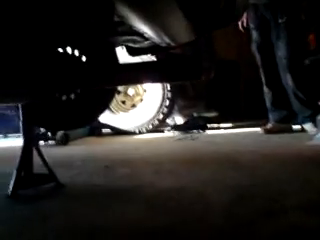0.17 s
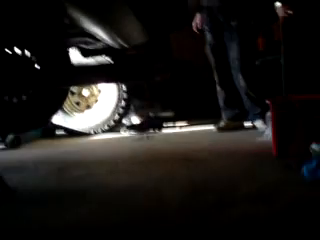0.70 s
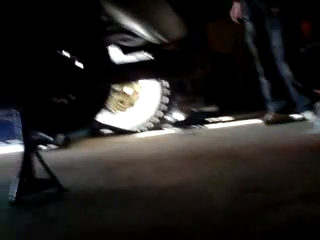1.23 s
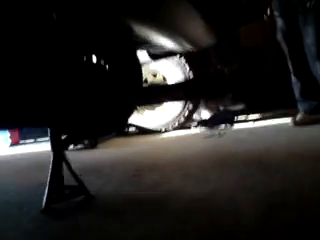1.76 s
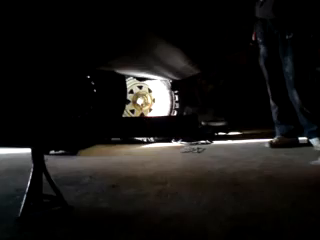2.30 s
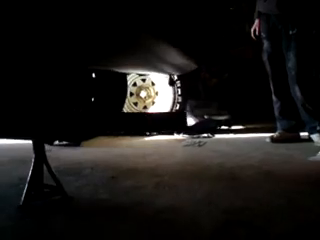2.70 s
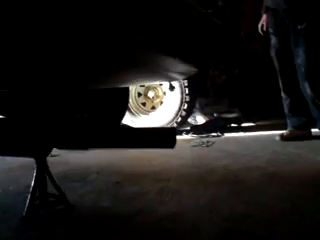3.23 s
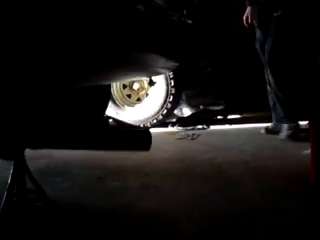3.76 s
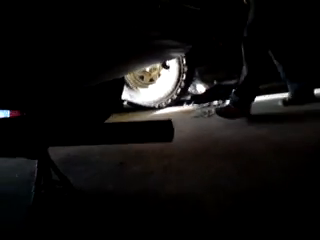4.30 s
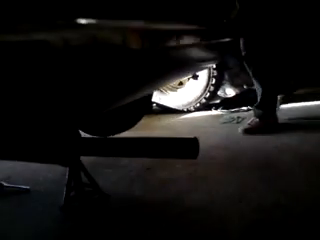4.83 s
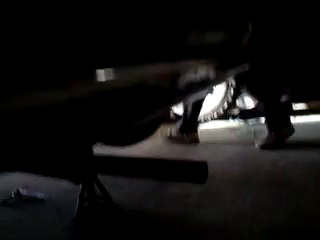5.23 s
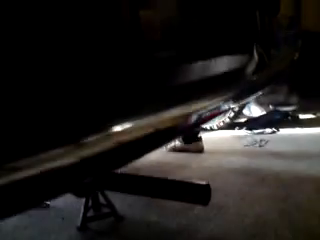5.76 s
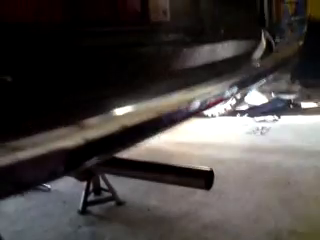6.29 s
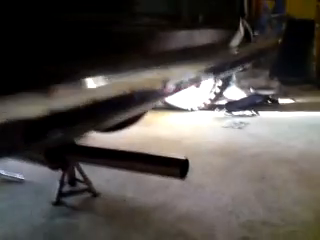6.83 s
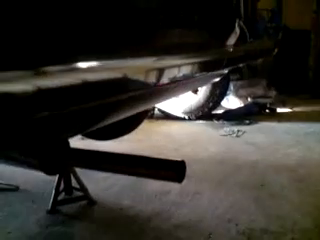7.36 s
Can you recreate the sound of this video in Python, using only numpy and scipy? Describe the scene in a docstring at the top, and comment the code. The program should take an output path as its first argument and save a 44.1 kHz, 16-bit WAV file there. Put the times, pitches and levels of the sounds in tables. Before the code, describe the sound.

A small four-cylinder car engine runs loudly through a homemade exhaust in a workshop, heard close, its uneven pulses slightly overloading the microphone. From the start it is blipped with a raspy bark over a mechanical whirr, climbing to higher revs from about 1 to 2.7 seconds. A thin leak whistle chirps between 1.7 and 2.4 seconds, and the pipe rings faintly around 2 seconds. Two more sharp blips come at about 3 and 3.6 seconds. By 4.5 seconds the engine settles into a lumpy idle that keeps slowing. A deep thrum swells around 5.5 seconds, followed by a hollow note until about 6.5 seconds as the microphone passes the pipe's mouth. From 6.1 to 6.8 seconds something metal rubs with a ringing hiss. The idle throbs on to the end at 7.5 seconds, with a short room echo.

```python
"""First comes the bark of a small four-cylinder engine, blipped through a homemade exhaust in a workshop.
Two cylinders fire much harder than the others; their pulses excite the pipe's modes, rasp at its mouth
and overload the microphone. The engine whirrs behind, and a leak chirps at high revs. As the engine
sinks to a lumpy idle, the air under the car thrums, a hollow note swells and the microphone passes
the pipe mouth. Near the end something rubs with a ringing hiss."""
import sys
import numpy as np
from scipy import signal
from scipy.fft import rfft, irfft, next_fast_len
from scipy.io import wavfile
from scipy.ndimage import uniform_filter1d

SR = 44100
rng = np.random.default_rng(int(sys.argv[2]) if len(sys.argv) > 2 else 0)


def bounce(signal):
    """Save signal as a 16-bit WAV file at the path given by the first command-line argument."""
    frames = np.transpose(np.atleast_2d(signal))
    limited = np.clip(frames, -1, 1)
    pcm = np.round(limited * 32767).astype(np.int16)
    wavfile.write(sys.argv[1], SR, pcm)


N = 331191
TIME = np.arange(N) / SR

# Crankshaft speed. Each row: time in seconds, revolutions per minute.
CRANK_SPEED = [(0.0, 2015.0), (0.19, 2120.0), (0.39, 1890.0), (0.65, 2034.0), (1.11, 2547.0),
               (1.39, 2671.0), (1.69, 2435.0), (2.12, 2717.0), (2.58, 2553.0), (2.98, 2112.0),
               (3.32, 2316.0), (3.6, 1892.0), (3.76, 2088.0), (4.06, 2219.0), (4.42, 1874.0),
               (5.13, 1874.0), (5.87, 1578.0), (6.7, 1447.0), (7.5, 1397.0)]
LOW_RPM, MID_RPM, TOP_RPM = 1450, 1900, 2650
SETTLE_S = [4.1, 4.56]   # revving gives way to idling
# Pedal presses. Each row: start in seconds, rise time in seconds, widest opening (0-1), release in
# seconds, opening at release (0-1).
PEDAL_PRESSES = [(-.2, .2, .87, .08, .8), (.35, .28, .86, 1.42, .35), (1.43, .29, .56, 2.88, .25),
                 (2.97, .1, .93, 3.26, .78), (3.58, .15, .94, 4.04, .8), (4.33, .27, .4, 7.6, .23)]
# The four firings. Each row: coasting strength in dB, then its change in dB at full throttle, at lowest
# idle and at top speed.
FIRING_STRENGTHS = [(1.6, 1.0, -6.3, 3.1), (0.3, -0.2, 2.6, 3.7), (-3.7, -10.0, -3.4, -3.5),
                    (-3.4, -7.6, -4.2, -3.2)]
# Firing order. Each entry: nominal position as a fraction of the cycle.
FIRING_PHASES = [.009, .262, .533, .81]

# Modes of the pipe and the space under the car. Each row: frequency in Hz, bandwidth in Hz, then relative
# strength (sign gives the side of the node) at the blips, at high revs, idling beside the pipe, passing
# its mouth and behind the car.
EXHAUST_MODES = [(38.2, 15.8, 0.3, 0.7, -1.3, -0.1, -0.7), (55.6, 27.9, -0.6, -0.8, 0.8, 0.3, 0.3),
                 (73.2, 13.5, 0.5, 0.1, -0.8, 0.2, 0.6), (90.4, 14.4, -1.2, 0.4, 0.2, -1.2, -0.7),
                 (102.1, 8.5, 0.3, -0.7, -1.2, -0.4, -1.7), (121.4, 36.3, 0.45, -0.0, 1.1, 0.9, 0.9),
                 (166.3, 17.4, -0.3, -0.2, -1.5, -0.7, -1.0), (201.0, 13.8, -0.9, -0.9, 0.0, 0.6, 1.2),
                 (217.3, 22.7, 1.0, -0.2, 1.3, 0.2, 0.7), (249.4, 244.3, -2.2, 1.0, -0.0, -0.4, -0.5),
                 (282.7, 23.9, -0.3, -1.2, -0.6, -0.5, -0.9), (326.2, 23.7, 0.4, 0.3, 0.3, 0.15, 0.0),
                 (352.6, 19.1, 0.2, 0.5, 0.2, -0.0, 0.15), (397.1, 29.2, 0.25, 0.2, -0.1, -0.0, -0.0),
                 (437.2, 18.2, 0.1, -0.1, 0.7, 0.3, 0.5), (471.0, 116.7, 0.5, 0.0, 0.0, -0.1, -0.1),
                 (532.7, 30.0, -0.0, -0.0, 0.1, -0.2, 0.0), (571.8, 29.8, 0.1, 0.2, 0.2, -0.1, -0.1),
                 (620.3, 40.1, 0.12, 0.1, 0.3, -0.2, -0.1), (839.5, 49.7, -0.0, 0.1, 0.1, -0.1, -0.12)]
BLIP_RPM, HIGH_RPM = 2150, 2550
APPROACH_S, PAST_S = [5.3, 5.8], [6.2, 6.6]   # the microphone nears the mouth, then goes behind the car
# Boom of the low modes. Each row: time in seconds, relative level in dB.
BOOM_ENVELOPE = [(0.0, -23), (0.31, -24), (0.46, -17), (0.62, -25), (1.27, -20), (2.78, -21), (2.9, -17),
                 (3.28, -26), (3.41, -21), (3.55, -27), (3.72, -20), (4.28, -27), (4.55, -16), (5.24, -16),
                 (5.51, -21), (5.91, -16), (6.23, -18), (7.5, -17)]
# Gain laws. Each lists, in dB: gain coasting at middle speed, then its change at full load, per doubling
# of speed and once idling.
BARK_LAW = (-29.3, 14.9, -2, -.3)
EDGE_LAW = (-3, 4.5, -2, -3)   # the bark's bright part, relative to the rest
RASP_LAW = (-35.3, 1.8, 10, 3.6)
HISS_LAW = (-39.7, 5.4, 3.5, 1.8)

# Spectra of the rasp and the hiss. Each row: frequency in Hz, relative spectral density in dB.
RASP_SPECTRUM = [(350, -32), (600, -3), (752, -8.5), (830, -5), (885, -5.5), (1090, -6.3), (1200, -7.5),
                 (1430, -9.5), (1610, -8.3), (1820, -13.5), (2400, -18.5), (3120, -40.5), (5280, -120)]
HISS_SPECTRUM = [(1180, -32.5), (2000, -1), (2400, -2), (2720, 1), (3130, 2), (3570, 0), (3890, -1),
                 (5000, -9), (6360, -11.5), (6730, -13.5), (7130, -33), (7860, -21), (10200, -50),
                 (17300, -120)]
# Slow wander of both. Each row: time in seconds, gain in dB.
TREBLE_DRIFT = [(0, .2), (.75, -1.3), (1.3, .3), (1.9, 0), (2.6, 1.5), (3.05, 2.4), (3.2, -.5), (4.3, -.8),
                (6.5, 1.6), (7, -1)]
# Modes of the pipe wall. Each row: frequency in Hz, bandwidth in Hz, relative level in dB.
WALL_RESONANCES = [(828, 26, 0), (950, 30, -5), (1215, 40, -13)]
# Ringing of the wall. Each row: time in seconds, level in dB.
WALL_ENVELOPE = [(0, -54), (1.1, -48), (1.35, -44), (1.7, -48), (2.0, -32.5), (2.3, -32.5), (2.7, -42),
                 (3.5, -49), (4.3, -48), (4.7, -36), (5.4, -38), (5.9, -40.5), (7.5, -38.5)]
# Whistle of the leak. Each row: time in seconds, frequency in Hz, level in dB.
LEAK_WHISTLE = [(1.62, 3500, -56), (1.75, 3350, -35), (1.84, 3200, -36), (1.89, 3900, -37.5),
                (2.05, 4050, -41), (2.3, 4000, -44), (2.5, 3950, -54)]
# Air mode under the car. The row: frequency in Hz, bandwidth in Hz, peak gain in dB.
THRUM_RESONANCE = [(45, 26, 24)]
# Swell of that mode. Each row: time in seconds, level in dB.
THRUM_ENVELOPE = [(4.3, -50), (4.6, -33), (5.25, -28), (5.5, -18), (5.7, -18), (5.9, -31), (6.2, -30),
                  (6.5, -28), (7.5, -27)]
# Modes of the hollow note. Each row: frequency in Hz, bandwidth in Hz, relative level in dB.
HOLLOW_RESONANCES = [(464, 22, 0), (560, 26, -4)]
# Swell of the hollow note. Each row: time in seconds, level in dB.
HOLLOW_ENVELOPE = [(5.3, -60), (5.65, -36), (6.0, -35.5), (6.35, -36), (6.7, -42), (7.5, -46)]

# Course of the rubbing. Each row: time in seconds, level in dB.
RUB_ENVELOPE = [(6.04, -71), (6.13, -35.5), (6.27, -29.5), (6.45, -27), (6.62, -28), (6.77, -30),
                (6.84, -62)]
# Friction noise. Each row: frequency in Hz, relative spectral density in dB.
RUB_SPECTRUM = [(530, -34.5), (900, -10), (1270, -7), (1320, -4.5), (1430, -11.5), (1560, -5), (2800, -12),
                (3120, -4), (5620, -26), (6100, -25), (7860, -49), (10200, -84), (17300, -120)]
# Modes of the rubbed metal. Each row: frequency in Hz, bandwidth in Hz, peak gain in dB.
RUB_RESONANCES = [(1122, 22, 8), (1338, 24, 10), (1530, 40, 4), (1808, 24, 5), (2345, 50, 4), (3020, 60, 5),
                  (3230, 45, 4), (3490, 35, 3)]
# Tones sustained by friction. Each row: frequency in Hz, level in dB relative to the friction noise.
RUB_TONES = [(365, -8), (1340, -13), (3022, -21)]


def from_db(db):
    """Amplitude grows tenfold for every 20 dB."""
    return 10 ** (np.asarray(db) / 20)


def in_time(rows, at=TIME):
    """Linear interpolation of each column against the first, time."""
    seconds, *columns = np.transpose(rows)
    return [np.interp(at, seconds, column) for column in columns]


def butter(x, hz, kind, order=2):
    """A causal Butterworth filter, maximally flat in its passband."""
    return signal.sosfilt(signal.butter(order, hz, kind, fs=SR, output="sos"), x + 1e-18)


def below(x, hz, order=4):
    """Zero-phase low-pass: filtering forwards and backwards cancels the delay."""
    return butter(butter(x, hz, "low", order)[::-1], hz, "low", order)[::-1]


def levelled(x):
    """Division by the running rms holds the level at 1 but keeps the throb within each engine cycle."""
    size = SR // 11
    return x / np.sqrt(uniform_filter1d(uniform_filter1d(x * x, size), size) + 1e-20)


def resonator(x, hz, width):
    """Forced response of one damped mode, with unit gain at resonance."""
    return signal.lfilter(*signal.iirpeak(hz, hz / width, fs=SR), x)


def resonate(x, peaks):
    """Resonances in series each lift a band. Each peak: frequency in Hz, bandwidth in Hz, gain in dB."""
    for hz, width, db in peaks:
        x = x + (from_db(db) - 1) * resonator(x, hz, width)
    return x


def coloured(x, spectrum):
    """Filtering by multiplication in the frequency domain."""
    hz, db = np.transpose(spectrum)
    size = next_fast_len(N)
    bins = np.maximum(np.fft.rfftfreq(size, 1 / SR), 1)
    gain = from_db(np.interp(np.log(bins), np.log(hz), db, left=-99, right=-99))
    return irfft(rfft(x, size) * gain, size)[:N]


def dying(x, seconds):
    """Exponential decay follows each impulse, with the given time constant."""
    return signal.lfilter([1], [1, -np.exp(-1 / (seconds * SR))], x + 1e-18)


def eddies(pulses, seconds):
    """Turbulence decays after each pulse as a burst of noise."""
    return dying(pulses, seconds) * rng.standard_normal(N)


def scatter(x, t60):
    """Diffuse reflection from underbody, floor and walls: convolution with decaying unit-energy noise."""
    t = TIME[:int(t60 * SR)]
    echoes = rng.standard_normal(len(t)) * from_db(-60 * t / t60)
    return signal.oaconvolve(x, echoes / np.linalg.norm(echoes))[:N]


def throttle(at=TIME, shut_s=.04):
    """The opening (0-1) rises with each press, eases off, then relaxes exponentially under its spring."""
    opening = 0
    for start, rise, widest, end, last in PEDAL_PRESSES:
        held = np.interp(at, [start, start + rise, end], [0, widest, last])
        opening = opening + held * np.exp(-np.maximum(at - end, 0) / shut_s)
    return np.clip(opening, 0, 1)


def load():
    """Cylinder filling saturates: it rises quickly with the first of the opening, then levels off."""
    return 1 - (1 - throttle()) ** 2


def idling():
    """A linear crossfade from revving (0) to settled idle (1)."""
    return np.interp(TIME, SETTLE_S, [0, 1])


def engine_gain(law):
    """The effects of load, speed and idling add in decibels."""
    coasting_db, load_db, speed_db, idle_db = law
    doublings = np.log2(in_time(CRANK_SPEED)[0] / MID_RPM)
    return from_db(coasting_db + load_db * load() + speed_db * doublings + idle_db * idling())


def firings(lag_per_db=.0055, jitter_s=.00006, uneven_db=.7):
    """The four-stroke cycle gives four pulses in two turns; the weak ones leave later."""
    cycles = np.cumsum(in_time(CRANK_SPEED)[0]) / (120 * SR) - .88
    count = np.arange(-1, int(cycles[-1]) + 1)
    starts = np.interp(count, cycles, TIME)
    opening, rpm = throttle(starts), in_time(CRANK_SPEED, starts)[0]
    stumble = np.where((opening < .2) | (rpm < 1700), 2.2, 1)   # shut throttle or slow idle burns unevenly
    pulses = np.zeros(N)
    for phase, (coasting_db, open_db, low_db, top_db) in zip(FIRING_PHASES, FIRING_STRENGTHS):
        speed_db = np.interp(rpm, [LOW_RPM, MID_RPM, TOP_RPM], [low_db, 0, top_db])
        db = coasting_db + open_db * opening + speed_db
        timing, strength = rng.standard_normal((len(count), 2)).T
        onsets = np.interp(count + phase - lag_per_db * db, cycles, TIME, left=-1, right=-1)
        onsets += jitter_s * stumble ** 2 * timing
        heard = (onsets > 0) & (onsets < TIME[-1])
        pulses[(onsets[heard] * SR).astype(int)] += from_db(db + uneven_db * stumble * strength)[heard]
    return pulses


def pipe_ring(puffs, modes):
    """Modal superposition: each mode's weight depends on engine speed and microphone position."""
    fast = np.interp(in_time(CRANK_SPEED)[0], [BLIP_RPM, HIGH_RPM], [0, 1])
    near = np.interp(TIME, APPROACH_S, [0, 1])
    past = np.interp(TIME, PAST_S, [0, 1])
    idle = idling()
    blend = np.array([(1 - idle) * (1 - fast), (1 - idle) * fast, idle * (1 - near), near - past, past])
    return sum(np.dot(strengths, blend) / width * resonator(puffs, hz, width)
               for hz, width, *strengths in modes)


def exhaust(pulses, boom_db=1.6, split_hz=145, round_hz=460, steepen=2.2, turbulence=.01):
    """Impulse excitation: gas puffs ring the pipe with a low boom and a bark that grows with load."""
    puffs = below(pulses + turbulence * eddies(pulses, seconds=.008), hz=800)
    boom = pipe_ring(puffs, [mode for mode in EXHAUST_MODES if mode[0] < split_hz])
    boom = below(boom, round_hz, order=2)
    boom_gain = from_db(boom_db + in_time(BOOM_ENVELOPE)[0])
    bark = pipe_ring(puffs, [mode for mode in EXHAUST_MODES if mode[0] >= split_hz])
    mellow = below(bark, round_hz)
    edge = np.clip(load() ** 2 * steepen, np.maximum(idling(), .25), 1)   # round fronts on the overrun
    bark = mellow + edge * engine_gain(EDGE_LAW) * (bark - mellow)
    dip = from_db(-3.5 * np.exp(-((TIME - 6.12) / .24) ** 2))   # the bark dips briefly
    return boom_gain * levelled(boom) + engine_gain(BARK_LAW) * dip * levelled(bark)


def rush(pulses, spectrum, burst_s, ring_t60, reflected, pulsed):
    """Each firing tears noise from the pipe mouth; being incoherent, it adds in power to the whirr."""
    share = np.clip(pulsed * load(), 0, .97)
    burst = levelled(eddies(pulses, burst_s))
    clatter = levelled(scatter(pulses, ring_t60))
    whirr = rng.standard_normal(N)
    mixture = np.sqrt(share) * levelled(burst + reflected * clatter) + np.sqrt(1 - share) * whirr
    return levelled(coloured(mixture, spectrum))


def rumble(level_db=-32.5, band_hz=(28, 200)):
    """Noise confined to a low band is heard as a steady rumble."""
    return from_db(level_db) * levelled(butter(rng.standard_normal(N), band_hz, "band"))


def churn(pulses, level_db=-36.5, idle_db=-2.5, swirl_s=.025, band_hz=(230, 450)):
    """Turbulence in the pipe follows every firing, a low roughness that goes on between the blips."""
    swirl = butter(eddies(pulses, swirl_s), band_hz, "band")
    return from_db(level_db + idle_db * idling()) * levelled(swirl)


def burble(pulses, full_throttle_db=-26.5, swirl_s=.016, band_hz=(300, 800)):
    """Turbulent outflow: under throttle, gas tumbles out after each firing, coloured by two resonances."""
    swirl = butter(eddies(pulses, swirl_s), band_hz, "band")
    swirl = resonate(swirl, [(385, 70, 10), (690, 90, 2)])
    return from_db(full_throttle_db) * throttle() ** 1.5 * levelled(swirl)


def pop(pulses, full_throttle_db=-26, band_hz=(330, 640), top_hz=1000):
    """Under throttle each strong firing radiates from the mouth as a steep pressure front."""
    front = butter(-pulses ** 1.5, band_hz, "band", order=1)
    front = butter(front, top_hz, "low", order=3)
    return from_db(full_throttle_db) * throttle() ** 2 * levelled(resonate(front, [(420, 70, 6)]))


def crack(pulses, full_throttle_db=-31.5, crack_s=.005, band_hz=(900, 5500), blur=.45):
    """Nonlinear steepening: at wide throttle strong pulses become shocks that scatter under the car."""
    snap = eddies(pulses ** 1.5, crack_s)
    snap = butter(snap + blur * scatter(snap, t60=.08), band_hz, "band")
    snap = resonate(snap, [(3900, 1200, 7)])
    return from_db(full_throttle_db) * throttle() ** 3 * levelled(snap)


def ringing(pulses, modes, envelope, loose=.55, rattle_s=.014):
    """Damped modes are struck by each strong firing and driven unevenly by the gas that follows."""
    band_hz = [.8 * modes[0][0], 1.2 * modes[-1][0]]
    blows = levelled(butter(pulses ** 2, band_hz, "band"))
    stir = levelled(butter(eddies(pulses ** 2, rattle_s), band_hz, "band"))
    drive = blows + loose * stir
    ring = sum(from_db(db) * resonator(drive, hz, width) for hz, width, db in modes)
    return from_db(in_time(envelope)[0]) * levelled(ring)


def leak(pulses, half_width_hz=170, burst_s=.007):
    """Gas forced through a gap whistles as narrowband noise, amplitude-modulated by the firings."""
    hz, db = in_time(LEAK_WHISTLE)
    roughness = butter(rng.standard_normal(N), half_width_hz, "low")
    whistle = roughness * np.sin(2 * np.pi * np.cumsum(hz) / SR)
    return from_db(db) * levelled(whistle * dying(pulses, burst_s))


def thrum(pulses, band_hz=(35, 65)):
    """Cavity resonance: the pulses pump the air trapped between car and floor."""
    cavity = resonate(butter(-pulses, band_hz, "band"), THRUM_RESONANCE)
    return from_db(in_time(THRUM_ENVELOPE)[0]) * levelled(cavity)


def rubbing(grain=.12, grain_hz=120, waver=.5, waver_hz=12):
    """Friction drives metal modes with a grainy hiss and sustains a few wavering tones."""
    grip = np.exp(grain * levelled(butter(rng.standard_normal(N), grain_hz, "low")))
    friction = coloured(grip * rng.standard_normal(N), RUB_SPECTRUM)
    sound = levelled(resonate(friction, RUB_RESONANCES))
    for hz, db in RUB_TONES:
        flutter = waver * levelled(butter(rng.standard_normal(N), waver_hz, "low"))
        sound += from_db(db) * np.sqrt(2) * (1 + flutter) * np.sin(2 * np.pi * hz * TIME + flutter)
    return from_db(in_time(RUB_ENVELOPE)[0]) * sound


def scene():
    """Superposition: the direct sound of every source adds to the workshop's reverberation."""
    pulses = firings()
    rasp = rush(pulses, RASP_SPECTRUM, burst_s=.013, ring_t60=.085, reflected=1.2, pulsed=.75)
    hiss = rush(pulses, HISS_SPECTRUM, burst_s=.0055, ring_t60=.034, reflected=.41, pulsed=.56)
    treble = engine_gain(RASP_LAW) * rasp + engine_gain(HISS_LAW) * hiss
    direct = from_db(in_time(TREBLE_DRIFT)[0]) * treble + rumble()
    direct += exhaust(pulses) + churn(pulses) + burble(pulses) + pop(pulses) + crack(pulses)
    direct += leak(pulses) + thrum(pulses)
    direct += ringing(pulses, WALL_RESONANCES, WALL_ENVELOPE)
    direct += ringing(pulses, HOLLOW_RESONANCES, HOLLOW_ENVELOPE)
    direct += rubbing()
    room = scatter(butter(direct, 350, "high"), t60=.31)
    return (direct + from_db(-11.5) * room)[None]


def record(dry, ceiling=.48, knee=3.9, dull_hz=5200, cutoff_hz=8000):
    """Saturation in the microphone flattens the peaks; low-pass filters dull the top, then cut it."""
    squashed = dry / (1 + np.abs(dry / ceiling) ** knee) ** (1 / knee)
    dulled = butter(squashed, dull_hz, "low", order=3)
    return signal.sosfilt(signal.cheby1(10, .5, cutoff_hz, fs=SR, output="sos"), dulled)


dry = scene()
out = record(dry)
bounce(out)
```